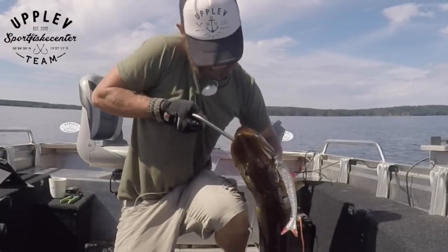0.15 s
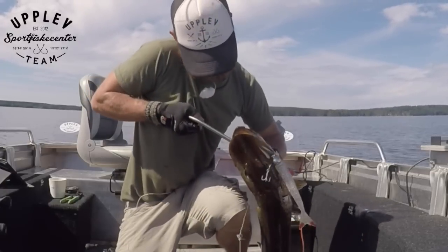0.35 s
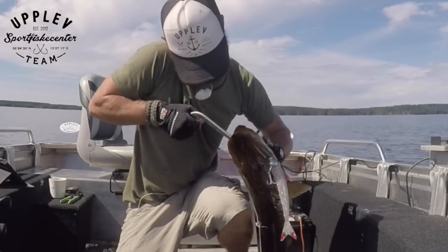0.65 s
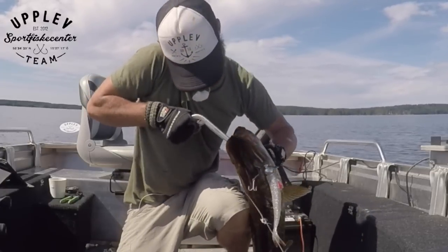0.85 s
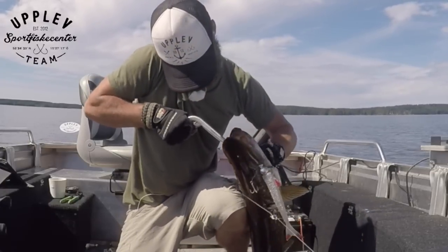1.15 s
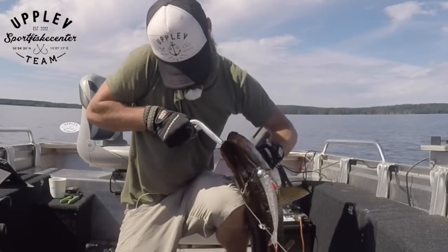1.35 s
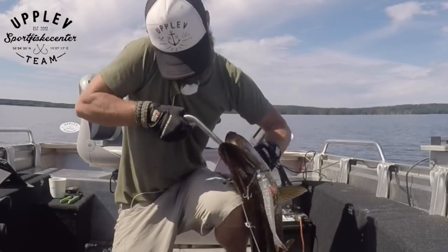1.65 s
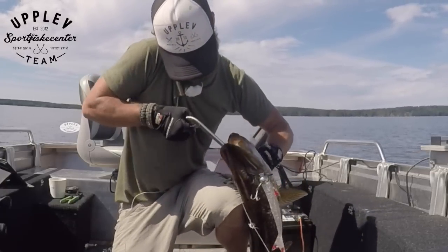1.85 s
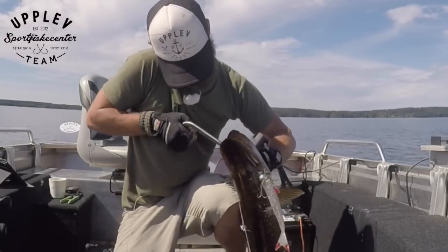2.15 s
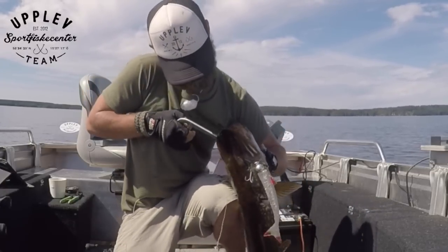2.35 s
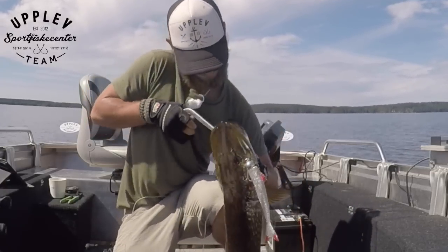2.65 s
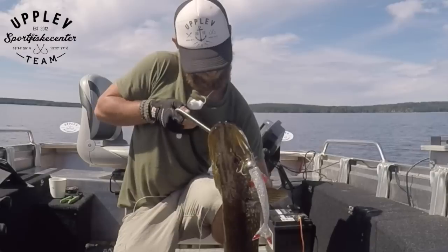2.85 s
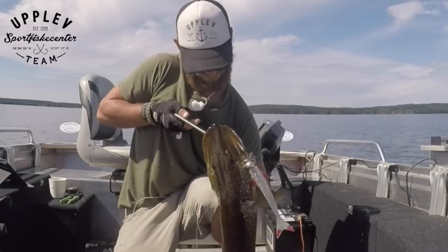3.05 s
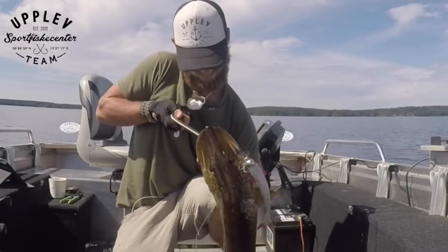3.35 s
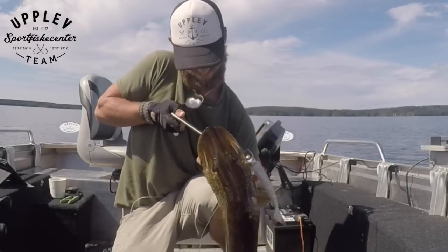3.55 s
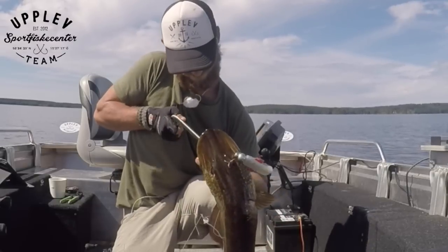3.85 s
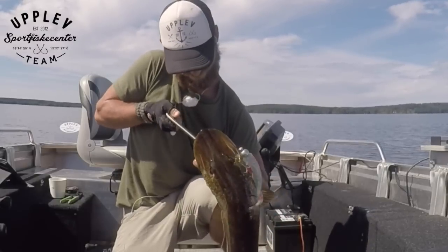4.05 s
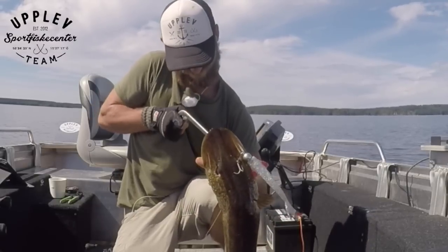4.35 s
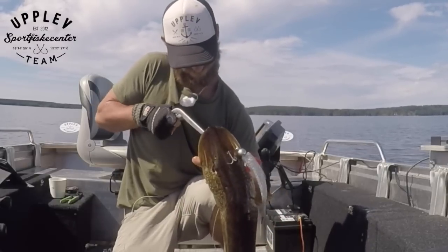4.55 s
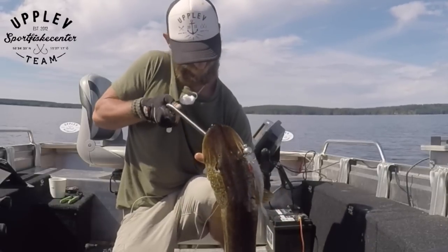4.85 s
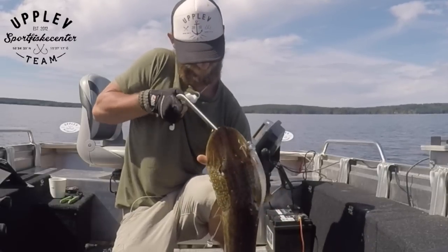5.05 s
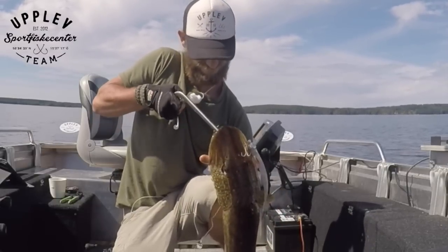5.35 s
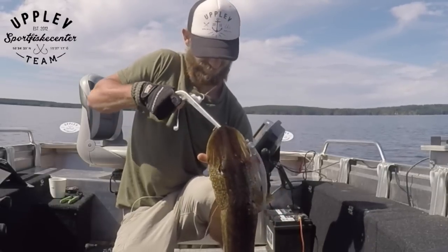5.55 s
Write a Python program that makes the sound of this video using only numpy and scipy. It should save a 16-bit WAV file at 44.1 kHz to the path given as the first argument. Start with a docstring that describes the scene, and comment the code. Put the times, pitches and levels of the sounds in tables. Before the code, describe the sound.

Close, dry metallic ticks of pliers on fish hooks start faint and sparse, then grow into sharp irregular clinks around one and a half to two seconds. After a quieter gap, another hard cluster comes near three to four seconds, with dull knocks. Tiny scrapes and wet glove rubs fill between touches. Soft hull plops, ripples and faint airy hiss lie behind, outdoors on a small boat.

```python
"""A light tick of steel over a wash of ripples comes first: long pliers work a lure's hooks loose in a fish's mouth.
Each touch is a crack of noise plus brief decaying modes of hand-damped steel, with rebounds and a dull thud.
Between touches the jaws scrape in tiny slips, the lure ticks softly and wet gloves rub as filtered noise.
Dull knocks come with the harder tugs; around the small boat on calm water, damped tones plop at the hull,
noise with many small laps makes the ripples, and a faint flickering hiss is the open air."""
import sys
import numpy as np
from scipy import signal
from scipy.fft import rfft, irfft, next_fast_len
from scipy.io import wavfile

SR = 44100
rng = np.random.default_rng(int(sys.argv[2]) if len(sys.argv) > 2 else 0)


def wav_record(signal):
    """Record a signal, one row per channel, as 16-bit PCM in the file named by sys.argv[1]."""
    frames = np.transpose(np.atleast_2d(signal))
    bounded = np.clip(frames, -1, 1)
    # unit amplitude maps onto the largest positive 16-bit level
    quanta = np.round(bounded * 32767).astype(np.int16)
    wavfile.write(sys.argv[1], SR, quanta)


N = 250691
TIME = np.arange(N) / SR

# steel on hooks; levels are rms over 10 ms, sparkle is relative to the ring:
# start_s, ring_db, thud_db (dull, into the fish), sparkle_db, pitch_hz (rings most)
CLINKS = [(0.0169, -45, -54, -1, 9000), (.05, -57, -56.5, -8, 8660), (.161, -63, -56.5, -2, 7800),
          (.191, -57, -47.5, -1, 6980), (.238, -51.5, -53.5, 6, 11700), (0.243, -52.5, -47.5, -15, 5800),
          (.284, -48.5, -51, -6, 7360), (.412, -38, -39.5, -4, 5770), (.48, -52.5, -58, 6, 6340),
          (.86, -47.5, -58, 12.5, 8630), (.87, -48, -52, 5.5, 8620), (0.932, -47.5, -50, 15, 8700),
          (.969, -64, -49.5, -8, 8630), (1.161, -49.5, -57, -7, 10600), (1.38, -54, -49.5, -11, 8650),
          (1.442, -39, -59, -3, 8650), (1.452, -26, -41.5, 0.5, 10650), (1.592, -41, -52.5, -6, 7900),
          (1.603, -38.5, -56, -3, 8630), (1.6157, -30.5, -47, -3, 8650), (1.6836, -26.5, -48, -8, 6600),
          (1.701, -30.5, -50, -7, 8470), (1.946, -38.5, -58, 5, 10670), (1.993, -31, -47.5, -1, 6000),
          (2.032, -41, -49.5, 10, 11700), (2.065, -22, -45, -11, 7800), (2.1238, -38.5, -54, -0.5, 10700),
          (2.2904, -48, -74, 4, 8800), (2.348, -39.5, -68, 3, 8580), (2.437, -54.5, -77, 2, 8800),
          (2.47, -57.5, -70, 5.5, 9710), (2.8493, -46, -60.5, -5, 5800), (3.0367, -46.5, -59, -1.5, 7620),
          (3.149, -40.5, -54, 8.5, 7000), (3.152, -34.5, -61, -3, 6160), (3.193, -40.5, -52, -3, 11700),
          (3.2029, -29.5, -51, -4.5, 6140), (3.265, -55, -55, -16, 6150), (3.296, -52, -73, -9, 5220),
          (3.323, -50, -72, -20, 5230), (3.339, -43, -73, 2.5, 5700), (3.345, -42.5, -61, -23, 5760),
          (3.3685, -36.5, -53.5, -4, 6800), (3.565, -26, -39, -1.5, 5040), (3.6726, -46, -44, -4, 5800),
          (3.69, -32, -36, -3, 6250), (3.703, -40.5, -42, -5.5, 12900), (3.721, -53, -46, -5.5, 6000),
          (3.7938, -20.5, -40, 2.5, 6346), (3.803, -34, -34.5, 1.5, 9420),
          (3.8123, -39.5, -46, -11.5, 6640), (3.819, -43, -38.5, 1, 6600), (3.98, -60, -58, -9, 5220),
          (4.141, -67.5, -51.5, -8.5, 7000), (4.311, -37, -48.5, -1.5, 5300), (4.696, -40, -61.5, -7, 7800),
          (4.715, -48.5, -49.5, -7, 9450), (4.74, -47.5, -68, -2, 9800), (4.8488, -50.5, -63.5, -8, 5270),
          (5.015, -44.5, -44, -10, 5220), (5.075, -47.5, -53, -12.5, 9580), (5.087, -46, -53, -4, 6970),
          (5.098, -49.5, -59.5, -7.5, 9460), (5.2487, -62.5, -72, -2, 6940), (5.4438, -57, -74, -7.5, 5320),
          (5.4955, -44, -76.5, -6, 5170), (5.5224, -44.5, -73, -6, 13850), (5.6052, -38, -60, 3, 7800),
          (5.61, -37.5, -55.5, 1.5, 7800)]
# limits of thud, clank, ring, lower sparkle and upper sparkle: edge_hz
BAND_EDGES_HZ = [400, 2000, 5000, 9000, 11300, 15500]
# the clank is weak while the hooks dangle and strong once the jaws bite: time_s, clank_db (re the ring)
GRIP = [(0, -4.5), (1.16, -6.5), (1.6, -29), (2.3, -28), (3.15, -4), (3.56, 1.5), (3.69, -6), (3.79, -2.5),
        (4.31, -1), (4.72, -19), (5.02, -8.5), (5.5, -2.5), (5.62, -16)]
# flesh damps the steel, from a free touch to one pressed into the fish: thud_db, ring_time_factor
DAMPING = [(-47.5, 1), (-42, 0.53)]
# lower and upper half of the sparkle: share_db
SPARKLE_SHARES_DB = [-4, -6]
# lead of the favoured mode at a hard touch; lighter ones ring it less
LEAD_DB, LEAD_PER_DB, HARD_RING_DB = 17.5, 0.56, -28.5
THUD_T60_S = 0.15  # the flesh soaks up the low modes faster still


def clinks(graze_db=-21, graze_s=0.002):
    """Each touch has a thud, a clank set by the grip, a ring and a sparkle; a light graze leads it in."""
    out = np.zeros(N)
    t = TIME[:SR // 8]
    for s, ring_db, thud_db, sparkle_db, ring_hz in CLINKS:
        loose = np.interp(thud_db, *np.transpose(DAMPING))
        lead_db = LEAD_DB + LEAD_PER_DB * (ring_db - HARD_RING_DB)
        blow = chatter(touch(t, ring_hz, lead_db, loose))
        thud, *steel = [band(blow, low, high, order=4)
                        for low, high in zip(BAND_EDGES_HZ, BAND_EDGES_HZ[1:])]
        clank_db = ring_db + np.interp(s, *np.transpose(GRIP))
        sparkles_db = ring_db + sparkle_db + np.array(SPARKLE_SHARES_DB)
        levels_db = thud_db, clank_db, ring_db, *sparkles_db
        sound = 0
        for part, db in zip([thud * decay(t, THUD_T60_S), *steel], levels_db):
            strength = np.sqrt(np.sum(part ** 2) / (SR / 100))  # its energy as rms over 10 ms
            sound = sound + from_db(db) * part / strength
        add(out, s, sound)
        add(out, s - graze_s, from_db(graze_db) * sound)
    return out


# modes of the pliers and lure: pitch_hz, level_db, t60_s
MODES = [(785, -2.5, 0.07), (1260, -19.5, .025), (1310, -6.5, 0.026), (1660, -19.5, 0.038),
         (2560, -8, 0.0079), (3360, -15, 0.0088), (3620, -10.5, 0.032), (5190, -12, .05), (5710, -8, .022),
         (6150, 0, .042), (6990, -3, .035), (7800, -1, .038), (8650, -3, .048), (9440, -5, .045),
         (10660, -4, .045), (9540, -11, .03), (11730, -13, 0.026), (13200, -16, 0.0083), (11900, 6, 0.029),
         (14000, -22.5, 0.16), (14850, -22.5, .025)]


def touch(t, ring_hz, lead_db, loose=1, favour_width_hz=250, vary_db=5.0, shift=0.011,
          twin_db=-8, twin_hz=130, crack_db=13, crack_t60=0.0015,
          scatter_db=6, scatter_t60=0.016, deck_db=-23, deck_t60=0.12):
    """One contact: a crack, its scatter off nearby surfaces, and modes favoured by the spot that is hit."""
    hz, db, t60 = np.transpose(MODES)[:, :, None]
    chance = rng.standard_normal((3, len(hz), 1))
    favoured = np.exp(-((hz - ring_hz) / favour_width_hz) ** 2)
    db = db + favoured * lead_db + (1 - favoured) * vary_db * chance[0]
    hz = hz * (1 + shift * chance[1])  # grip and hook load shift the modes at every touch
    phase = rng.random((2, len(hz), 1))
    # the two jaws ring slightly apart and beat
    jaw = np.sin(2 * np.pi * (hz * t + phase[0]))
    twin = np.sin(2 * np.pi * ((hz + twin_hz * chance[2]) * t + phase[1]))
    jaws = jaw + from_db(twin_db) * twin
    ring = np.sum(from_db(db) * decay(t, t60 * loose) * jaws, axis=0) + hook_ring(t)
    crack = from_db(crack_db) * decay(t, crack_t60)
    scatter = from_db(scatter_db) * decay(t, scatter_t60)
    deck = from_db(deck_db) * decay(t, deck_t60)
    return hollowed(ring + (crack + scatter + deck) * rng.standard_normal(len(t)))


def hook_ring(t, hook_db=-15, hook_t60=0.037, count=18):
    """Hook points and split rings: many weak partials, new at every touch."""
    pitch, phase = rng.random((2, count, 1))
    hz = 4800 + 9000 * pitch ** 1.5
    partials = np.sin(2 * np.pi * (hz * t + phase))
    return from_db(hook_db) * decay(t, hook_t60) * np.sum(partials, axis=0)


# hollows between the families of modes: centre_hz, width_hz, depth_db
HOLLOWS = [(1995, 1100, -11), (4500, 1300, -8), (11370, 830, -7.5)]


def hollowed(x):
    """Carve causal dips into the spectrum."""
    for hz, width_hz, depth_db in HOLLOWS:
        peak = signal.lfilter(*signal.iirpeak(hz, hz / width_hz, fs=SR), x)
        x = x - (1 - from_db(depth_db)) * peak
    return x


def chatter(blow, span_s=0.0037, rebound=0.74, count=4):
    """Steel rebounds a few times within milliseconds, which combs each touch in its own way."""
    out = blow.copy()
    for when, size in rng.random((count, 2)):
        strength = rebound * (1 - when / 2) * (2 * size - 1)  # of either sign, weaker when late
        add(out, when * span_s, strength * blow)
    return out


# jaws sliding on hook wire, mostly just before they slip off with a clink: start_s, length_s, level_db
SCRAPES = [(0.127, 0.021, -53), (0.329, 0.056, -54), (0.466, 0.25, -63), (1.331, 0.1, -49),
           (1.575, 0.085, -47), (1.914, 0.058, -43.5), (2.105, 0.047, -51), (2.17, 0.22, -55.5),
           (2.79, 0.16, -55.5), (3.225, 0.11, -55), (4.485, 0.029, -54.5), (4.663, 0.052, -48),
           (4.73, 0.065, -55)]


def scrapes(slips_per_s=300, lead_db=4, loose=0.98):
    """Sliding steel: a run of uneven slips, each a tiny touch on the spot of the nearest clink."""
    out = np.zeros(N)
    slips = grains(slips_per_s, spread_db=5.0)
    clink_s, *_, clink_hz = np.transpose(CLINKS)
    for s, length_s, db in SCRAPES:
        swell = stroke(length_s)
        ring_hz = clink_hz[np.argmin(np.abs(clink_s - s - length_s / 2))]
        run = slips[round(s * SR):][:len(swell)] * swell
        slide = signal.fftconvolve(run, touch(TIME[:SR // 20], ring_hz, lead_db, loose))
        sound = band(slide, 3100, 12000, order=1)
        strength = np.sqrt(2 * np.sum(sound ** 2) / len(swell) + 1e-20)
        add(out, s, from_db(db) * sound / strength)
    return out


def jiggle(level_db, per_s=7, count=5):
    """Dangling hooks and split rings tick faintly at random, each with its own colour."""
    t = TIME[:SR // 20]
    ticks = sum(signal.fftconvolve(grains(per_s, spread_db=3.0), touch(t, 6140, 0))[:N]
                for hook in range(count))
    return from_db(level_db) * rms_one(band(ticks, 600, 12000, order=1))


# dull knocks of fish and tool on the hardest tugs: start_s, pitch_hz, level_db, t60_s
KNOCKS = [(.374, 1120, -47.5, 0.052), (.412, 1390, -16, 0.013), (1.399, 808, -32, 0.049),
          (2.059, 183.4, -35.5, 0.17), (2.066, 1250, -39, 0.018), (3.369, 190, -31.5, .024),
          (3.565, 203, -33.5, 0.046), (3.566, 805, -24.5, 0.028), (3.567, 1065, -41.5, 0.088),
          (3.69, 262, -35, 0.064), (3.703, 800, -30, 0.035), (3.7945, 2530, -13.5, 0.0089),
          (3.803, 838, -24.5, 0.045), (3.804, 230, -27.5, 0.015), (3.819, 290, -32.5, 0.068),
          (4.716, 1510, -33.5, 0.0098)]


def knocks():
    """Fish and tool knock dully: damped tones of steady pitch with a quick rise."""
    return damped_tones(KNOCKS, rise_s=0.0012, glide_per_s=0, rough=0.56)


# runs of soft ticks as the lure's body tumbles against the fish: start_s, length_s, rms_db
TUMBLES = [(0.026, 0.52, -64.5), (0.847, 0.15, -65.5), (2.109, .04, -58), (2.778, 0.18, -63.5),
           (3.303, .06, -63.5), (3.827, 0.18, -64), (4.657, 0.1, -60)]


def tumbles(ticks_per_s=160, tick_t60=0.02, low_hz=750, high_hz=3400):
    """Soft plastic on wet skin: uneven dull ticks that hardly ring."""
    out = np.zeros(N)
    t = TIME[:SR // 20]
    ticks = 0
    for spot in range(4):  # each spot has its own tick
        hits = grains(ticks_per_s / 4, spread_db=6.5)
        tick = decay(t, tick_t60) * rng.standard_normal(len(t))
        ticks = ticks + signal.fftconvolve(hits, tick)[:N]
    ticks = hollowed(band(ticks, low_hz, high_hz))
    for s, length_s, db in TUMBLES:
        swell = stroke(length_s)
        add(out, s, from_db(db) * rms_one(swell * ticks[round(s * SR):][:len(swell)]))
    return out


# gloves and sleeves on wet skin: start_s, length_s, level_db (before the swell), tilt_db_per_octave
RUBS = [(.01, 0.23, -76, -6), (0.845, .17, -55.5, -2), (1.174, 0.2, -54.5, 2), (1.673, 0.097, -49.5, -5.5),
        (1.735, 0.19, -60, -5.5), (2.37, 0.092, -58, 17), (2.524, 0.15, -55, -5), (2.681, 0.075, -50, -4.5),
        (2.778, 0.19, -66, -5), (3.781, 0.09, -46.5, -5), (3.82, 0.15, -75.5, 2)]
# colour of the rubbing, before each stroke's tilt: frequency_hz, gain_db
GLOVE_SPECTRUM = [(1000, -13.5), (2000, -12.5), (4000, -9), (7000, -1), (10000, 0.5), (14500, 4),
                  (16000, -2)]


def gloves(crackle=0.4, snag_db=2.5):
    """Wet cloth rubbing: strokes of fine hiss that snag and crackle."""
    out = np.zeros(N)
    hiss = rng.standard_normal(N)
    crackles = crackle * rms_one(grains(per_s=230, spread_db=7.5))
    snags_db = snag_db * np.clip(drift(380), -1.5, 1.5)
    friction = coloured(hiss + crackles, GLOVE_SPECTRUM) * from_db(snags_db)
    for s, length_s, db, tilt_db in RUBS:
        swell = stroke(length_s)
        size = len(swell)
        spectrum = rfft(friction[round(s * SR):][:size])
        hz = np.arange(len(spectrum)) * SR / size
        octaves = np.log2(np.maximum(hz, 1500))  # the tilt starts at 1500 Hz
        rub = rms_one(irfft(spectrum * from_db(tilt_db * octaves), size))
        add(out, s, from_db(db) * swell ** 1.4 * rub)
    return band(out, 110, 20000)


# water plops at the hull: start_s, pitch_hz, level_db
PLOPS = [(.919, 642, -40.5), (1.362, 177, -47.5), (2.182, 335, -47), (2.186, 582, -51.5), (2.24, 1040, -50),
         (2.62, 146, -51), (3.108, 318, -56), (3.171, 426, -43.5), (3.236, 849, -46.5), (4.15, 154.3, -52),
         (4.312, 498, -40.5), (4.35, 456, -48.5), (5.37, 418, -57.5)]


def plops(t60_s=0.13):
    """Water plops at the hull: damped tones that swell softly and bend upward."""
    rows = [(*plop, t60_s) for plop in PLOPS]
    return damped_tones(rows, rise_s=0.014, glide_per_s=0.8, rough=0.5)


# ripples along the hull, a level curve before its trim: time_s, level_db
WASH = [(0.0, -57.5), (0.08, -65), (0.65, -67.5), (1.28, -60.5), (1.44, -69), (1.66, -65), (1.82, -59),
        (2.09, -62), (2.26, -63.5), (4.37, -66), (4.44, -67), (4.93, -71), (5.33, -68), (5.68, -76)]
# colour of the ripples: frequency_hz, gain_db
WATER_SPECTRUM = [(18, -56), (30, -38), (153, -2), (193, -0.5), (239, -1), (375, -4.5), (465, -2.5),
                  (551, -7.5), (793, -5), (1090, -12), (1910, -18.5), (3400, -20), (5000, -17.5),
                  (6500, -41), (11000, -120)]


def water(trim_db=2.76, lap_db=-6, patchy_db=3.67):
    """Ripples: a wash with many small laps in it, each octave swelling and sinking by itself."""
    (wash_db,) = in_time(WASH)
    lap = decay(TIME[:SR // 20], 0.0083) * rng.standard_normal(SR // 20)
    laps = signal.fftconvolve(grains(per_s=120, spread_db=8.5), lap)[:N]
    wash = coloured(rng.standard_normal(N) + from_db(lap_db) * rms_one(laps), WATER_SPECTRUM)
    edges_hz = 25 * 2.0 ** np.arange(9)
    swells = 0
    for low, high in zip(edges_hz, edges_hz[1:]):
        sos = signal.butter(2, [low, high], "band", fs=SR, output="sos")
        octave = signal.sosfiltfilt(sos, wash, padtype="even")
        swells = swells + octave * from_db(patchy_db * drift(6.7))
    return from_db(wash_db + trim_db) * rms_one(swells)


# faint hiss of the open air, a level curve before its trim: time_s, level_db
HISS = [(0.0, -58), (0.35, -62), (0.55, -61.5), (1.69, -63.5), (2.17, -61), (2.32, -64), (3.31, -66),
        (3.89, -60.5), (4.0, -64.5), (4.54, -60), (5.21, -68), (5.68, -64.5)]
# colour of the hiss: frequency_hz, gain_db
AIR_SPECTRUM = [(1000, -15.5), (2000, -4.5), (4000, -8.5), (7000, 1), (10000, -0.5), (14500, 0), (16000, 0)]


def air(level_db, tick_db=-9, flicker_db=2.0):
    """Faint hiss with a gently flickering level, dotted with tiny wet ticks."""
    tick = decay(TIME[:SR // 20], 0.003) * rng.standard_normal(SR // 20)
    ticks = signal.fftconvolve(grains(per_s=37, spread_db=-0.5), tick)[:N]
    hiss = coloured(rng.standard_normal(N) + from_db(tick_db) * rms_one(ticks), AIR_SPECTRUM)
    return from_db(level_db + flicker_db * drift(16)) * hiss


def damped_tones(rows, rise_s, glide_per_s, rough):
    """Low tones that swell and die away, bend by the glide and carry some noise around their pitch."""
    out = np.zeros(N)
    t = TIME[:SR // 4]
    for s, hz, db, t60 in rows:
        tone = np.sin(2 * np.pi * hz * t * (1 + glide_per_s * t / 2))
        noise = band(rng.standard_normal(2 * len(t)), hz * 0.61, hz * 1.52)
        noise = rms_one(noise[len(t):])  # skip the filter's build-up
        shape = (1 - np.exp(-t / rise_s)) * decay(t, t60)
        add(out, s, from_db(db) * shape / shape.max() * (tone + rough * noise) / (1 + rough))
    return band(out, 92, 4000, order=4)


def grains(per_s, spread_db):
    """Tiny impulses at random times, of uneven size and either sign."""
    sizes = from_db(spread_db * np.minimum(rng.exponential(1, N), 4)) * rng.choice([-1, 1], N)
    return sizes * (rng.random(N) < per_s / SR)


def stroke(length_s):
    """Level of one swell of movement, half a sine."""
    size = round(length_s * SR)
    return np.sin(np.pi * np.arange(size) / size)


def drift(rate):
    """Random curve with a spread of about 1 and a new target rate times a second."""
    return np.interp(TIME * rate, np.arange(4000), rng.standard_normal(4000))


def coloured(x, spectrum):
    """Filter a noise by the spectrum, drawn over log frequency, and scale it to rms 1."""
    hz, db = np.transpose(spectrum)
    size = next_fast_len(N)
    f = np.maximum(np.arange(size // 2 + 1) * SR / size, 1)
    gain = from_db(np.interp(np.log(f), np.log(hz), db))
    return rms_one(irfft(rfft(x, size) * gain, size)[:N])


def band(x, low, high, order=2):
    """Causal band-pass."""
    return signal.sosfilt(signal.butter(order, [low, high], "band", fs=SR, output="sos"), x)


def decay(t, t60):
    """Exponential fall by 60 dB in t60."""
    return np.exp(-np.log(1000) * t / t60)


def from_db(db):
    """Decibels to gain."""
    return 10 ** (np.asarray(db) / 20)


def rms_one(x):
    """Scale to rms 1."""
    return x / np.sqrt(np.mean(x ** 2) + 1e-20)


def in_time(rows):
    """The columns of a curve at every sample."""
    s, *columns = np.transpose(rows)
    return [np.interp(TIME, s, c) for c in columns]


def add(track, s, sound):
    """Mix a sound in at time s."""
    at = max(0, round(s * SR))
    track[at:at + len(sound)] += sound[:len(track) - at]


def scene():
    """Pliers and fish close by, water all around."""
    (hiss_db,) = in_time(HISS)
    steel = clinks() + scrapes() + jiggle(hiss_db - 10.5)  # the jiggle follows the hiss curve
    handling = knocks() + tumbles() + gloves()
    background = plops() + water() + air(hiss_db - 1)
    return (steel + handling + background)[None]


def record(dry, cutoff_hz=15300):
    """The top is cut steeply by an elliptic low-pass."""
    return signal.sosfilt(signal.ellip(10, 0.2, 70, cutoff_hz, fs=SR, output="sos"), dry)


dry = scene()
out = record(dry)
wav_record(out)
```